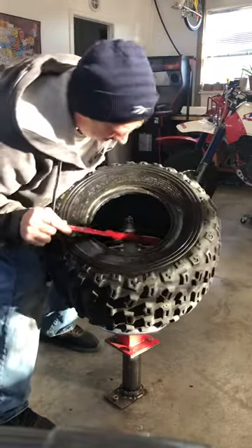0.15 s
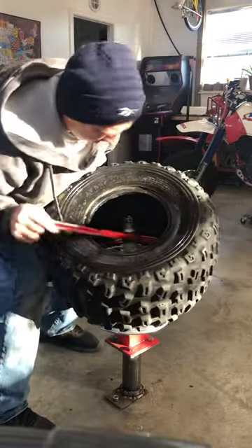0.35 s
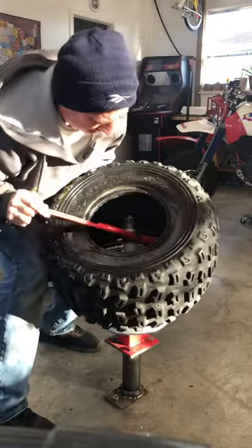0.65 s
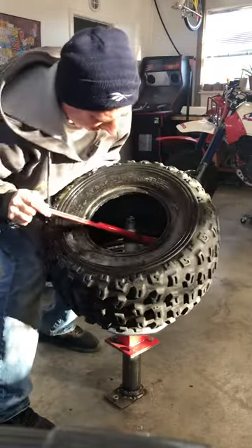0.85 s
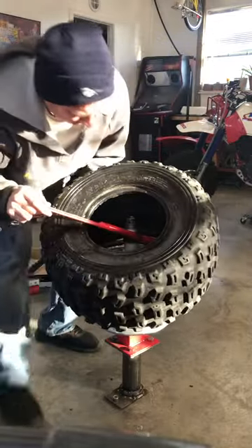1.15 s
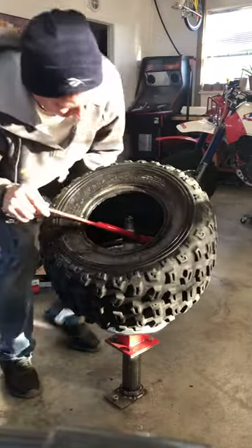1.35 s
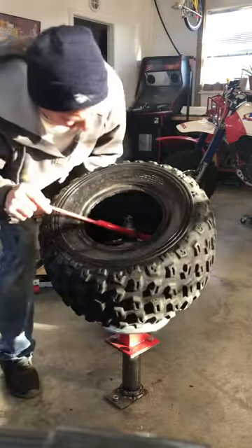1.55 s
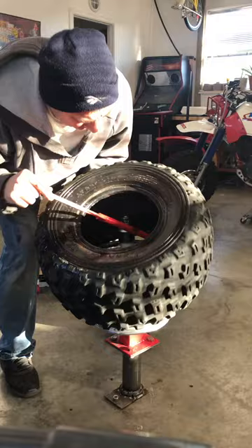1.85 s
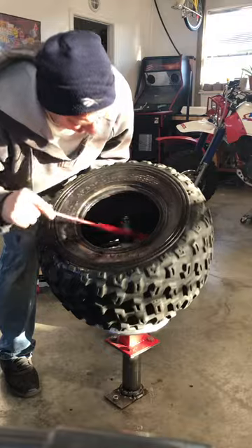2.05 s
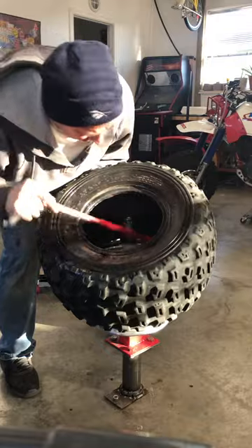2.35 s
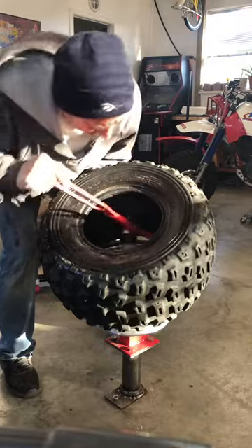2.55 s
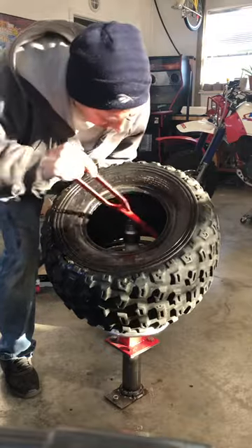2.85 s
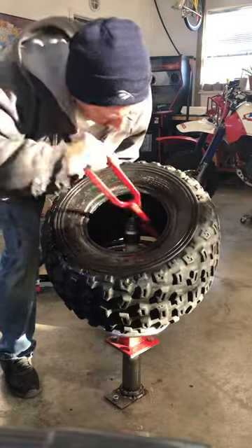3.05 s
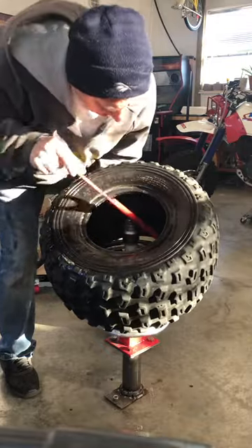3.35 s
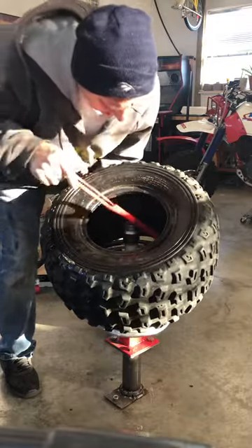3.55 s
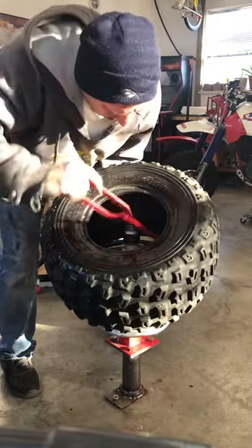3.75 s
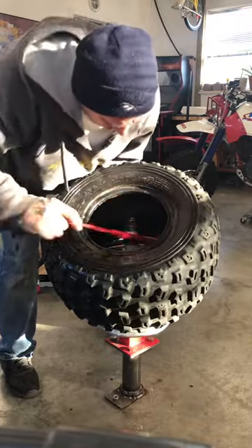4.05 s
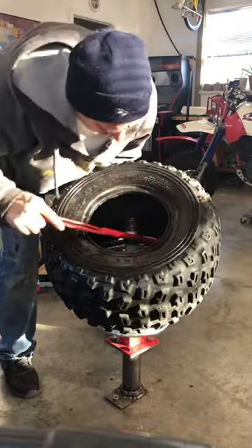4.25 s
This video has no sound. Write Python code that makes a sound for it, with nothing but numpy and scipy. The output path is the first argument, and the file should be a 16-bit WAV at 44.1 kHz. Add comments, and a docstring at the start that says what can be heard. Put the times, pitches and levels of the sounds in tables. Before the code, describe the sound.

A faint, steady low motor hum and soft, low-weighted air hiss lie under everything in a moderately echoing garage. At once there are dull, hollow booms of air in a tyre with a soft scuff, repeated around 0.3 s as a bar drags on rubber. Weaker thumps and rubbing continue to about 0.7 s, with a light high tick near 0.75. Clothing rustles brightly, swelling to about 1.2 s. A dry knock with a tyre thump comes at 1.44, another with a deeper boom at 1.72, then faint dragging. At 2.31 a loud, sharp steel crack rings briefly, with a thin lingering tone and a tyre boom. Near-quiet follows until a medium knock and scuff at 3.22, small clicks to 3.37 and a light tick at 3.68. A second hard, bright clank with a hollow thump lands at 4.15 and dies into the room.

```python
"""A dull boom of the air in a tyre and a soft scuff come first, then the rustle of clothes and a dragging bar.
A steel bar is worked round a small wheel rim in a garage: filtered noise bursts make its cracks, and
decaying sines its ringing, the stand's post, the tyre's wall and the booms of the air inside.
Random clicks through filters and resonators make the rustle, the noisy tails of blows and the drag. A sum of
wavering sines gives a distant motor's hum, shaped noise the hiss, and convolution with decaying noise the room."""
import sys
import numpy as np
from scipy import signal
from scipy.fft import rfft, irfft
from scipy.io import wavfile
from scipy.ndimage import uniform_filter1d

SR = 44100
rng = np.random.default_rng(int(sys.argv[2]) if len(sys.argv) > 2 else 0)


def to_wav(s):
    """Save 16-bit WAV."""
    ch = np.atleast_2d(s).T  # columns
    pcm = np.round(np.clip(ch, -1, 1) * 32767)  # PCM
    wavfile.write(sys.argv[1], SR, pcm.astype(np.int16))


def ratio_of_db(decibels):
    """Turn decibels (scalar or array-like) into linear amplitude factors; 0 dB maps to 1."""
    return 10 ** (np.asarray(decibels, float) / 20)


N = 194920  # length in samples
STEP = 40  # samples between points of a slow control curve

# motor hum: (multiple of the turning rate, rms level [dB])
HUM_PARTIALS = [(1, -59), (2, -59), (3, -65), (4, -53.5), (5, -79.5)]
HUM_HZ = 67.1
# spectrum of the air and street noise: (frequency [Hz], relative density [dB per Hz])
HISS_SPECTRUM = [(28, -39.5), (42, -29), (56, -14), (80, -18), (100, -14), (165, -12.5), (220, -17),
                 (300, -20.5), (540, -29.5), (1100, -33), (1700, -40), (4000, -46), (9000, -53),
                 (15000, -53.5)]
HISS_DB = -56.5  # rms
# reverberation of the garage: (frequency [Hz], decay by 60 dB [s])
GARAGE_DECAY = [(250, 0.43), (1000, 0.5), (3000, 0.45), (8000, 0.26), (15000, 0.4)]
CRACK_ROOM_DB, RING_ROOM_DB, BOOM_ROOM_DB = -8.5, -8, -9  # sends to the room

# spectrum of rubbing cloth: (frequency [Hz], relative density [dB per Hz])
CLOTH_SPECTRUM = [(300, -9), (430, -3.5), (860, -11), (1330, -11.5), (2300, -7), (3300, -8.5), (4200, -3.5),
                  (6000, -9.5), (8500, -11), (12000, -15.5), (14800, -12.5), (17000, -14)]
# swishes of cloth, and short noisy tails after blows; swell and fade each span a tenfold change of amplitude:
# (time of height [s], level at 3-7 kHz before the leans [dB], swell [ms], fade [ms], treble lean [dB])
SWISHES_AND_TAILS = [(0.03, -58, 130, 280, -41), (0.285, -53, 70, 360, -9.5), (0.40, -62.5, 340, 550, 6),
                     (0.58, -66.5, 300, 330, -1), (0.76, -58, 86, 70, -13), (0.845, -62.5, 66, 110, -10),
                     (0.923, -56, 120, 55, -4), (1.04, -53.5, 87, 95, 1.5), (1.10, -48.5, 66, 89, 8),
                     (1.172, -45, 41, 64, -5), (1.23, -60.5, 79, 140, -9), (1.335, -61.5, 400, 134, 0),
                     (1.444, -61.5, 20, 164, -4), (2.0, -71, 65, 200.5, 4), (2.165, -70, 180, 330, 2.5),
                     (2.5, -65.5, 299.5, 200, -0.5), (3.385, -63, 90, 70, -3), (3.6, -74, 71, 98, -2),
                     (3.689, -63, 23, 60.5, 0), (4.1, -72, 80, 750, 2.5)]
SWISH_BASS_DB = -0.5  # lean of these, nearly whole under 1.8 kHz and a quarter over 3.2 kHz
# dull scuffs of rubber and soles:
# (time of height [s], level at 0.5-1.8 kHz before the dulling [dB], swell [ms], fade [ms])
SCUFFS = [(0.005, -45, 92, 148), (0.27, -50, 25, 100), (0.315, -48, 54, 70), (0.56, -55, 230, 330),
          (1.455, -51.5, 110, 100), (1.75, -54, 114, 110), (3.24, -49.5, 43, 200)]

# blows that reach the steel post of the stand: (time [s], level [dB], upper mode relative to lower [dB])
POST_BLOWS = [(2.314, -46, -6), (3.361, -60, -2), (4.15, -56, -13)]
# modes of the post, which rings on freely: (frequency [Hz], decay by 60 dB [s])
POST_MODES = [(1486, 1.2), (3030, 0.49)]

# bar dragged along the bead: (time of height [s], level [dB], swell [ms], fade [ms])
DRAG_STROKES = [(0.03, -72, 150, 140), (0.275, -50, 30, 110), (0.31, -50.5, 60, 110),
                (0.42, -62.5, 170, 250), (0.57, -54.5, 240, 140), (1.725, -61, 20, 100),
                (2.0, -68, 53, 250), (2.16, -64, 150, 295)]
# damped resonances of bar and bead: (frequency [Hz], width [Hz], relative level [dB])
DRAG_TONES = [(900, 90, -1.5), (1220, 90, -9), (1590, 84, -11), (1930, 120, 1), (3000, 120, -4.5),
              (3900, 200, -6), (4700, 200, -6), (5240, 250, -5), (5770, 120, -6.5), (10000, 500, -11),
              (12500, 500, -12), (15000, 900, -7.5)]

# jolts that shake the tyre: (time [s], peak level [dB], pitch of the air inside [Hz])
BOOMS = [(0.003, -30, 161), (0.049, -31, 178), (0.079, -31.5, 167), (0.166, -48, 151), (0.271, -34.5, 148),
         (0.317, -34.5, 161), (0.453, -43, 167), (0.54, -40.5, 167), (0.597, -40, 145), (0.659, -41, 175),
         (1.184, -43.5, 199), (1.447, -35, 172), (1.727, -26, 172), (1.855, -42, 175), (1.911, -42.5, 170),
         (2.331, -28, 175), (2.417, -40.5, 175), (2.926, -46, 167), (3.248, -46.5, 132),
         (3.289, -47, 197.5), (4.166, -32, 172)]
BOOM_RISE_MS, BOOM_T60_S = 6.7, 0.16
SPLIT_HZ, SPLIT_SHARE = 16, 0.14  # the squashed tyre splits the cavity tone into a beating pair
# modes of the rubber sidewall: (frequency [Hz], relative level [dB], decay by 60 dB [s])
SIDEWALL_MODES = [(117, -2.5, 0.066), (325.5, 4, 0.14), (436, 0.5, 0.11), (514, -3, .1), (600, -4, .1)]
WALL_DB = -17.5  # thud of the sidewall against the boom of the air

# cracks of the bar on rim and bead; the first row is a knock dying away; widths act as 0.2 octaves at least:
# (time of height [s], rms level there [dB], centre [Hz], colour width [octaves], contact length [ms])
CONTACTS = [(0.012, -57.5, 5020, 0.23, 69), (0.264, -50.5, 1880, 1.2, 9.1), (0.739, -50, 13000, 0.39, 1.7),
            (1.164, -47, 1130, 0.16, 10.2), (1.422, -56, 900, 0.69, 7.4), (1.434, -36.5, 1020, 0.22, 7.9),
            (1.440, -42.5, 2180, 0.65, 3.1), (1.47, -50, 570, 0.5, 49), (1.709, -47, 4840, 0.64, 8.2),
            (1.715, -38.5, 860, 0.58, 5.9), (1.717, -46.5, 2510, 0.37, 12), (1.745, -51.5, 420, 0.5, 30),
            (1.898, -56, 1240, 1.36, 10), (2.311, -23.5, 3540, 1.8, 4.78), (2.3146, -14.5, 1825, 1.6, 3.9),
            (2.656, -60, 1100, 0.36, 9.6), (2.908, -60.5, 5500, 1.8, 16), (3.165, -60.5, 4950, 2.4, 20),
            (3.222, -35, 1870, 0.73, 4.6), (3.223, -29.5, 1320, 0.51, 5.96), (3.227, -44, 3970, 0.94, 9.8),
            (3.24, -60, 12000, 1.0, 8.8), (3.276, -46.5, 8000, 2.8, 4.4), (3.343, -63, 9000, 1.7, 12),
            (3.364, -43.5, 4600, 2.5, 12), (3.68, -49.5, 3000, 5.5, 5.7), (4.146, -33, 3000, 1.05, 4.83),
            (4.150, -16, 2454, 1.84, 2.63)]
# steel on steel, hard enough to ring: (time [s], level [dB], spot along the bar [0 tip - 1 shaft])
STRIKES = [(2.311, -23, 0.0), (3.224, -54.5, 0.5), (3.276, -56, 0.58), (3.363, -52, 0), (3.681, -63, 0.5),
           (4.146, -30, 0.85)]
# modes of bar and rim, held and resting on rubber:
# (frequency [Hz], level struck at tip [dB], level struck on shaft [dB], longest decay by 60 dB [s])
STEEL_MODES = [(560, -23, -17, .08), (705, -24.5, -11.5, 0.15), (853, -12.5, -15, 0.22),
               (1222, -22, -1.5, 0.044), (1393, -19.5, -10, .08), (1856, -2, 1, 0.071),
               (1900, -4.5, 0.5, 0.1), (1978, -17.5, -10, 0.15), (2047, -6.5, -35.5, 0.13),
               (2135, -3, -2, 0.17), (2187, -7, -7, 0.087), (2268, -22, -10, 0.096), (2369, -27, -7.5, .12),
               (2490, -26.5, -1, .15), (2584, -22.5, -12, 0.14), (2677, -8.5, -2, 0.091),
               (2860, -12.5, -18.5, .15), (3381, -2.5, -46, 0.11), (3475, 1.5, 5, 0.053),
               (3593, -17.5, -1, 0.071), (3730, -8, -4, .1), (3965, -7.5, -6, 0.73), (4000, -19, -11, 0.69),
               (4098, -3, 1, 0.04), (4082, -4, -35, .1), (4420, -15.5, -31, .1), (5640, -17.5, -24, .08),
               (5790, -19, -7.5, .1), (6900, -10.5, -29, .06), (7510, -7.5, -37, 0.07),
               (7919, -25, -5, .08), (9250, -18.5, -17, 0.079), (11060, -17, -30, 0.054)]
SLIDE_MS = 4.0  # a strike slides this long, so the modes do not start together
GRIP_T60_S = 0.3  # the hand caps the decay at this, and at less above 4.2 kHz
RATTLE_DB = 2.8  # spread of the waver that the loose contact gives each ring


def rms_one(x):
    """Normalisation: divide by the root mean square."""
    return x / np.sqrt(np.mean(x ** 2) + 1e-20)


def at_hz(points, hz):
    """Logarithmic pitch scale: read a (frequency, value) table in equal steps of ratio."""
    table = np.array(points)
    return np.interp(np.log(hz), np.log(table[:, 0]), table[:, 1])


def full_rate(curve):
    """Linear interpolation of a slow control curve to every sample."""
    return np.interp(np.arange(N) / STEP, np.arange(len(curve)), curve)


def drift(rate_hz):
    """Low-passed noise: a slow random curve of spread 1, from a double pole at the rate."""
    r = np.exp(-2 * np.pi * rate_hz * STEP / SR)
    noise = rng.standard_normal(N // STEP + 2002)
    slow = signal.lfilter([1], [1, -2 * r, r * r], noise)[2000:]  # the filter has settled
    return full_rate(rms_one(slow - slow.mean()))


def bands(x):
    """Filter bank: third-octave bands, taken in turn from two sources, with their centres."""
    edges_hz = 26 * 2 ** np.arange(0, 9.6, 1 / 3)
    for k, (low, high) in enumerate(zip(edges_hz, edges_hz[1:])):
        sos = signal.butter(2, [low, high], "band", fs=SR, output="sos")
        yield np.sqrt(low * high), signal.sosfilt(sos, x[k % 2])


def ring(clicks, hz, t60):
    """Damped oscillator: a unit click starts a decaying sine of height about 1."""
    r, w = ratio_of_db(-60 / (t60 * SR)), 2 * np.pi * hz / SR
    return signal.lfilter([0, np.sin(w)], [1, -2 * r * np.cos(w), r * r], clicks + 1e-18)


def add(track, s, piece):
    """Superposition: mix a piece into a track at a time, no earlier than its start."""
    i = max(round(s * SR), 0)
    track[i:i + len(piece)] += piece[:N - i]


def slips(per_s, uneven_db):
    """Stick-slip as a random point process: two trains of clicks of uneven size, rms 1."""
    spread = np.minimum(rng.exponential(1, (2, N)), 4)
    sizes = rng.standard_normal((2, N)) * ratio_of_db(uneven_db * spread)
    return rms_one((rng.random((2, N)) < per_s / SR) * sizes)


def strokes(rows):
    """Exponential swell and decay: one slow envelope per row, straight in dB on either side."""
    s, db, rise_ms, fall_ms = np.array(rows)[:, :4].T[:, :, None]
    ms = (np.arange(N // STEP + 1) * STEP / SR - s) * 1000
    return ratio_of_db(db - 20 * np.where(ms < 0, -ms / rise_ms, ms / fall_ms))


def together(envelopes):
    """Incoherent addition: overlapping strokes add in power."""
    return full_rate(np.sqrt((envelopes ** 2).sum(axis=0)))


def hiss(patchy_db=1.44):
    """Broadband noise: steady air and street noise, each band wavering by itself."""
    total = 0
    for hz, band in bands(rng.standard_normal((2, N))):
        total = total + band * ratio_of_db(at_hz(HISS_SPECTRUM, hz) + patchy_db * drift(23.0))
    return ratio_of_db(HISS_DB) * rms_one(total)


def hum(waver_hz=0.084, waver_db=1.43):
    """Harmonic series: multiples of a motor's turning rate, which wanders slightly."""
    phase = 2 * np.pi * np.cumsum(HUM_HZ + waver_hz * drift(1.5)) / SR
    total = 0
    for k, db in HUM_PARTIALS:
        height = np.sqrt(2) * ratio_of_db(db + waver_db * drift(4.0))
        total = total + height * np.sin(k * phase + 0.713 * k * k)
    return total


def garage(x, gap_ms=2.0, even_hz=60.7):
    """Diffuse reverberation: convolution with noise that decays at a rate set by frequency."""
    t = np.arange(N) / SR
    echoes = 0
    for hz, band in bands(rng.standard_normal((2, N))):
        echoes = echoes + band * ratio_of_db(-60 * t / at_hz(GARAGE_DECAY, hz))
    t = t[:SR]
    response = rfft(echoes[:SR] * (1 - np.exp(-(t * 1000 / gap_ms) ** 2)))
    # even out the random response's narrow peaks and dips; bins are 1 Hz wide
    power = np.abs(response) ** 2 + 1e-12
    response *= np.sqrt(uniform_filter1d(power, size=900) / uniform_filter1d(power, size=int(even_hz)))
    fade_out = np.minimum((SR - np.arange(SR)) / SR * 2, 1) ** 4
    echoes = irfft(response) * fade_out
    return signal.fftconvolve(x, rms_one(echoes) / np.sqrt(SR))[:N]


def rustle(patchy_db=1.5, slow_db=1.0, grit_db=0.8):
    """Friction noise: dense random clicks, coloured as bright swishes and tails and as dull scuffs."""
    bright, scuff = strokes(SWISHES_AND_TAILS), strokes(SCUFFS)
    treble_db = np.array(SWISHES_AND_TAILS)[:, 4:]
    parts = [(hz, band * ratio_of_db(at_hz(CLOTH_SPECTRUM, hz)))
             for hz, band in bands(slips(9000.0, uneven_db=0.5)) if hz > 250]
    # reference levels of the scuffs and of the bright strokes
    low = np.std(sum(band for hz, band in parts if 500 < hz < 1800))
    mid = np.std(sum(band for hz, band in parts if 3000 < hz < 7000))
    out = 0
    grit = grit_db * drift(40.0)  # the cloth catches and lets go, in all bands at once
    for hz, band in parts:
        bass_lean_db = at_hz([(1800, 0.96), (3200, 0.24)], hz) * SWISH_BASS_DB
        treble_lean_db = at_hz([(6500, 0.086), (10000, 1)], hz) * treble_db
        dull_db = at_hz([(1200, -2.5), (2500, -14), (5000, -21)], hz)
        bright_level = bright * ratio_of_db(bass_lean_db + treble_lean_db) / mid
        scuff_level = scuff * ratio_of_db(dull_db) / low
        level = together(np.vstack([bright_level, scuff_level]))
        out = out + band * level * ratio_of_db(patchy_db * drift(8.4) + slow_db * drift(1.0) + grit)
    return out


def post():
    """Free vibration: a few blows pass through the hub and set two modes of the post ringing."""
    out = 0
    for k, (hz, t60) in enumerate(POST_MODES):
        clicks = np.zeros(N)
        for s, db, upper_db in POST_BLOWS:
            clicks[round(s * SR)] = ratio_of_db(db + k * upper_db)
        out = out + ring(clicks, hz, t60)
    return out


def drag(waver_db=-1.0):
    """Stick-slip excitation: slips of steel on rubber drive damped resonances of bar and bead."""
    rub = slips(1200.0, uneven_db=3.5)
    out = 0
    for k, (hz, width_hz, db) in enumerate(DRAG_TONES):
        tone = rms_one(ring(rub[k % 2], hz, 2.2 / width_hz))  # a narrow resonance dies slowly
        out = out + ratio_of_db(db + waver_db * drift(5.0)) * tone
    return together(strokes(DRAG_STROKES)) * rms_one(out)


def tyre(lead_ms=14.0):
    """Cavity and wall resonance: jolts start damped wall modes and a swelling, beating boom of air."""
    air, t = np.zeros(N), np.arange(SR // 3) / SR
    shape = (1 - np.exp(-t * 1000 / BOOM_RISE_MS)) ** 2 * ratio_of_db(-60 * t / BOOM_T60_S)
    pushes = np.zeros((len(SIDEWALL_MODES), N))
    count = len(SIDEWALL_MODES)
    for s, peak_db, hz in BOOMS:
        pair = np.sin(2 * np.pi * hz * t) + SPLIT_SHARE * np.sin(2 * np.pi * (hz + SPLIT_HZ) * t)
        boom = ratio_of_db(peak_db) * shape / shape.max() * pair / (1 + SPLIT_SHARE)
        add(air, s - 0.006, boom)
        # each wall mode starts at its own moment ahead of the listed time
        lead_s = lead_ms / 1000 * rng.uniform(0.27, 1, count)
        when = np.maximum((s - lead_s) * SR, 0).astype(int)
        pushes[np.arange(count), when] = ratio_of_db(peak_db + WALL_DB + rng.normal(0, 3.6, count))
    wall = sum(ratio_of_db(db) * ring(row, hz, t60) for row, (hz, db, t60) in zip(pushes, SIDEWALL_MODES))
    return air + wall


def bar_cracks(thud_db=-18.5, thud_hz=500.0, skirt_db=-20.5):
    """Contact noise: each row is a short burst of chatter, a coloured crack with a rubber thud."""
    cracks = np.zeros(N)
    t = np.arange(4096) / SR
    hz = np.fft.rfftfreq(4096, 1 / SR) + 1
    for s, crack_db, centre_hz, octaves, ms in CONTACTS:
        rise_s = ms / 3000  # the height comes after a third of the contact
        x = t / rise_s
        peak = np.exp(-2 * (np.log2(hz / centre_hz) / max(octaves, 0.2)) ** 2)
        skirt = ratio_of_db(skirt_db) * (hz > 300) / (1 + (hz / (3.0 * centre_hz)) ** 4)
        thud = ratio_of_db(thud_db) * np.exp(-2 * np.log2(hz / thud_hz) ** 2) * np.sqrt(centre_hz / thud_hz)
        grit = irfft(rfft(rng.standard_normal(4096)) * (peak + skirt + thud))
        add(cracks, s - rise_s, ratio_of_db(crack_db) * x * np.exp(1 - x) * rms_one(grit))
    return cracks


def steel_ring():
    """Modal excitation: the spot struck sets how strongly each damped mode of the steel rings."""
    modes = np.array(STEEL_MODES)
    count = len(modes)
    clicks = np.zeros((count, N))
    for s, db, spot in STRIKES:
        level_db = (1 - spot) * modes[:, 1] + spot * modes[:, 2]
        slide_s = SLIDE_MS / 1000 * (rng.random(count) - 0.4)
        when = ((s + slide_s) * SR).astype(int)
        clicks[np.arange(count), when] += ratio_of_db(db + level_db + rng.normal(0, 1.2, count))
    out = 0
    for row, (hz, _, _, t60) in zip(clicks, STEEL_MODES):
        held_t60 = min(t60, GRIP_T60_S * min(4200 / hz, 1) ** 1.5)
        out = out + ring(row, hz, held_t60) * ratio_of_db(RATTLE_DB * drift(60))
    return out


def scene():
    """Superposition of direct sound, reverberation and background."""
    cracks, steel, boom = bar_cracks(), steel_ring(), tyre()
    rubbing = rustle() + drag()
    to_room = ratio_of_db(CRACK_ROOM_DB) * (cracks + rubbing / 2)
    to_room = to_room + ratio_of_db(RING_ROOM_DB) * steel + ratio_of_db(BOOM_ROOM_DB) * boom
    direct = cracks + steel + post() + boom + rubbing
    return (direct + garage(to_room) + hum() + hiss())[None]


def roll_off(x):
    """The treble ends steeply here."""
    return signal.sosfilt(signal.butter(12, 16520, fs=SR, output="sos"), x)


def record(dry):
    """Band limiting: a small microphone loses the deep bass, and the top is cut steeply."""
    x = signal.sosfilt(signal.butter(2, 36.0, "high", fs=SR, output="sos"), dry)
    x = signal.sosfilt(signal.cheby2(12, 60, 16650, fs=SR, output="sos"), x)  # 60 dB down from 16650 Hz
    return roll_off(x)


dry = scene()
out = record(dry)
to_wav(out)
```